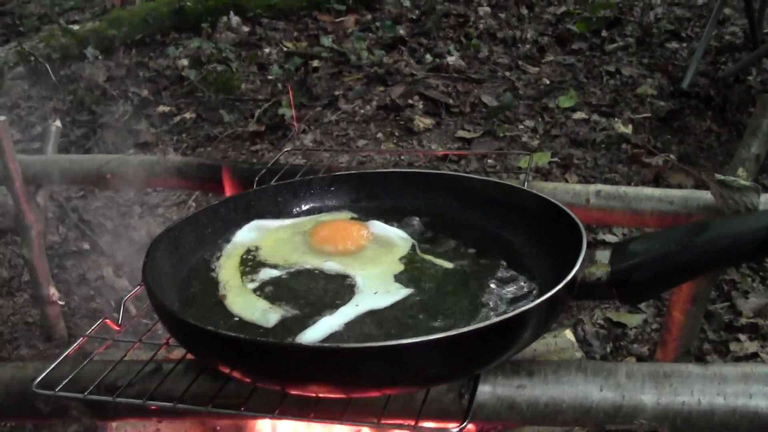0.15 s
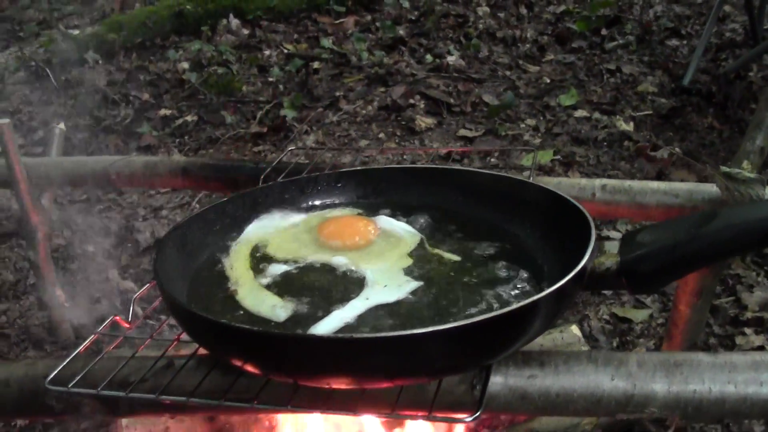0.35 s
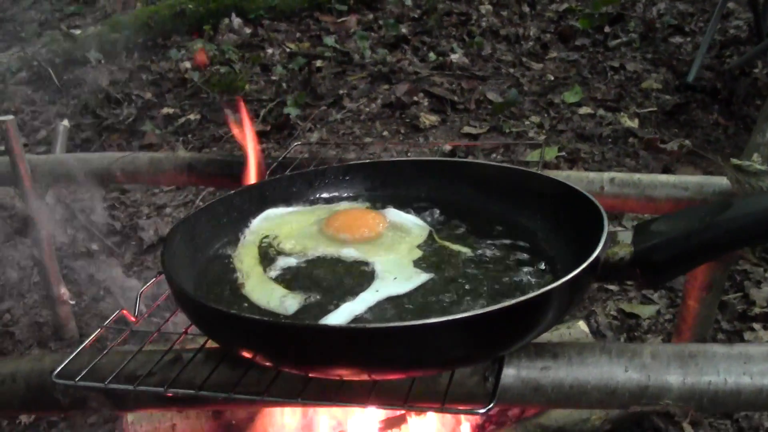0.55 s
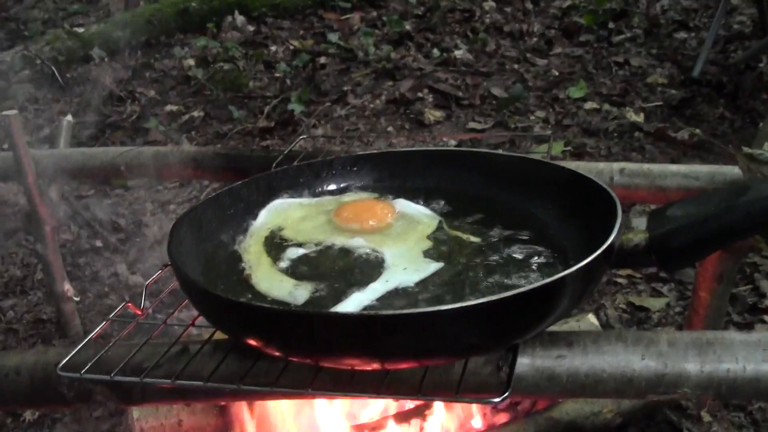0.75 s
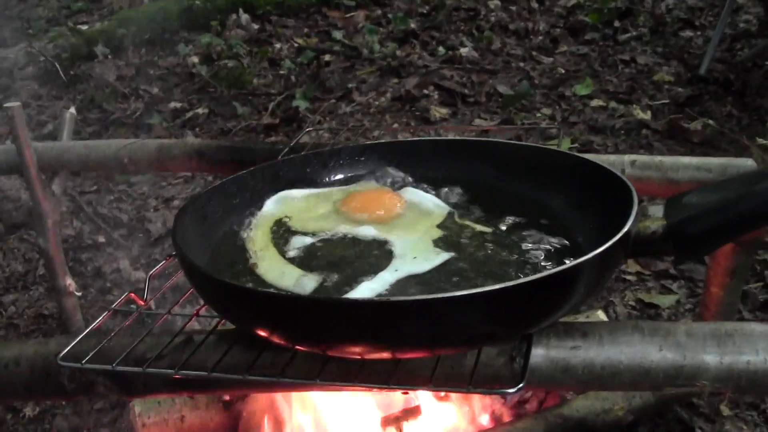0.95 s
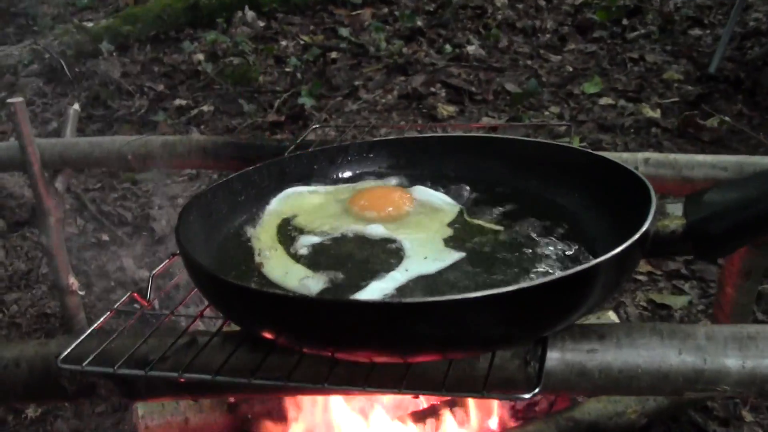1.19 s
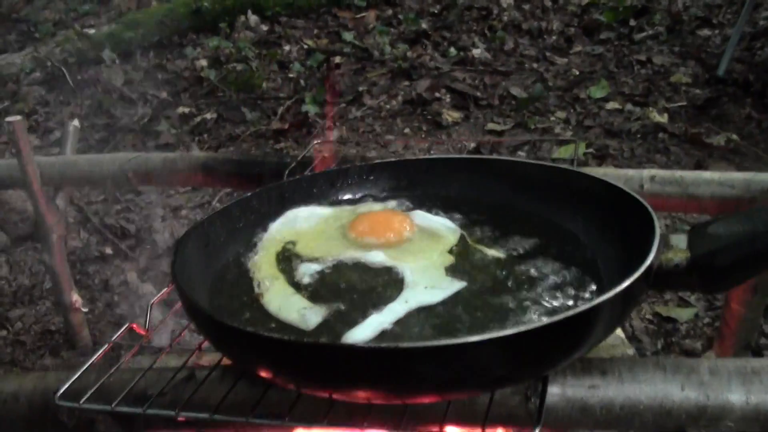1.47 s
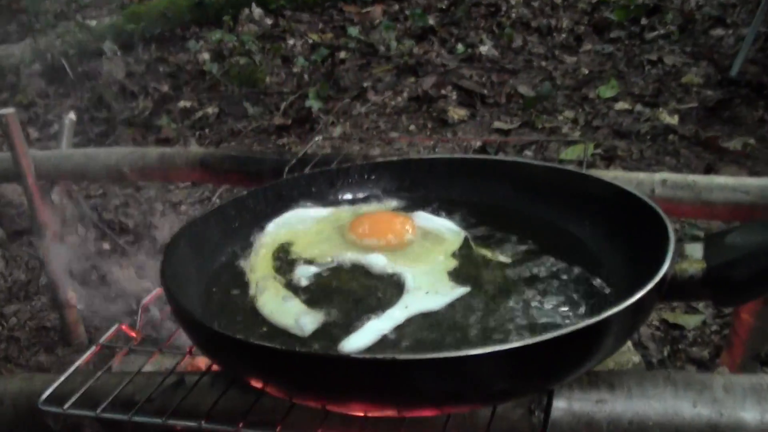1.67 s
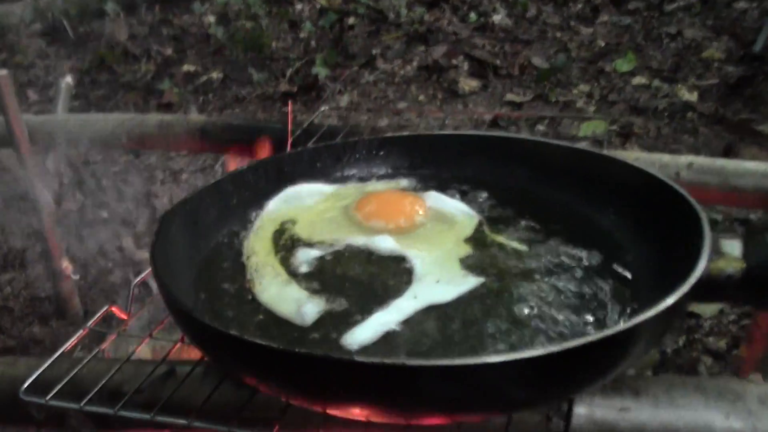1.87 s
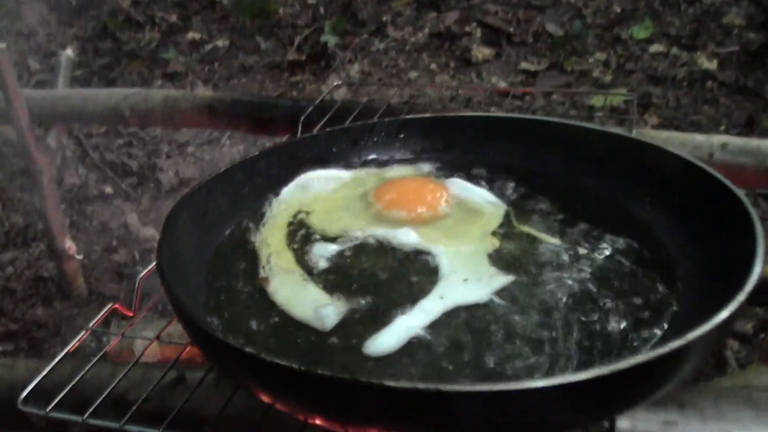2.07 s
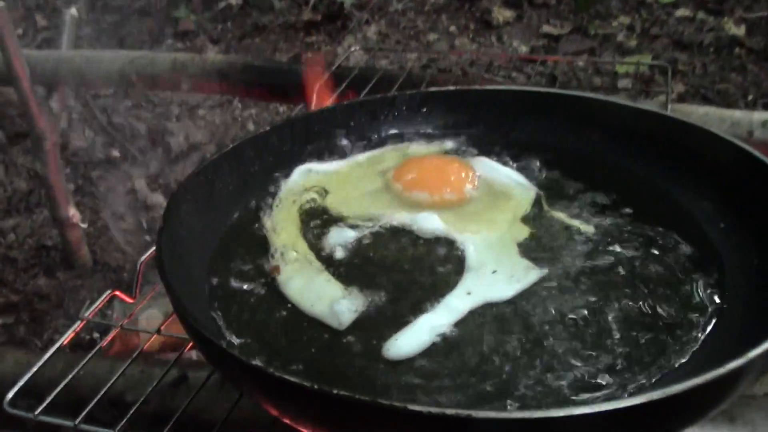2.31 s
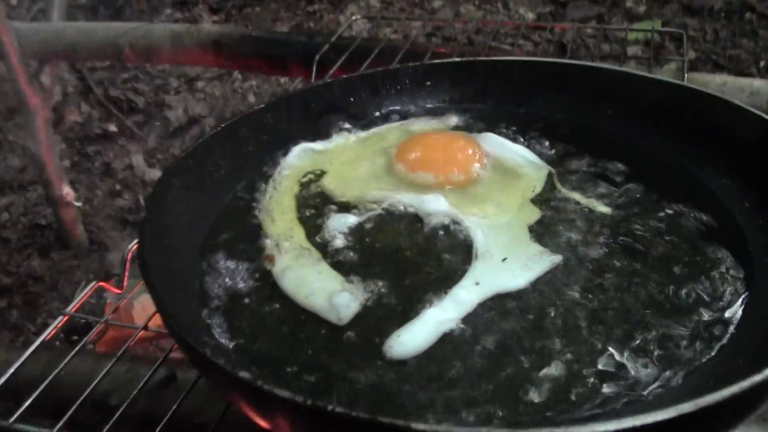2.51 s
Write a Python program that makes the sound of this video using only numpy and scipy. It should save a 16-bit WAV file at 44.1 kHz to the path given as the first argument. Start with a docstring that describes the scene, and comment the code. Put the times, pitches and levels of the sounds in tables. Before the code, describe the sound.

An egg sizzles in hot oil in a pan, with sharp irregular pops and spits

```python
"""An egg fries in oil over a campfire, heard from close by in the open air.
From the start steam bubbles sizzle as grains over hiss, water drops snap as damped resonances,
larger bubbles plop as rising sines, and the fire rumbles as low fluttering noise.
Near 1 s steam blurts from under the egg: gated flapping noise with gliding cavity tones.
Near 1.4 s the oil spits: noise jets through resonances; many of the later snaps are stronger."""
import sys
import numpy as np
from scipy import signal
from scipy.fft import rfft, irfft
from scipy.io import wavfile

SR = 44100
rng = np.random.default_rng(int(sys.argv[2]) if len(sys.argv) > 2 else 0)


def waveform_to_disk(signal):
    """Save audio, clipped to [-1, 1], as 16-bit WAV at the path in sys.argv[1]."""
    frames = np.transpose(np.atleast_2d(signal))
    scaled = np.clip(frames, -1, 1) * 32767
    samples = np.round(scaled).astype(np.int16)
    wavfile.write(sys.argv[1], SR, samples)


N = 116865

# vigour of the frying: t/s, treble level/dB before FIZZ_DB, middle level/dB before SIMMER_DB
VIGOUR = [(0.0, -40, -42.5), (0.32, -39.5, -41.5), (0.94, -40.5, -41), (1.3, -42, -41.5),
          (1.78, -39, -40.5), (2.35, -38, -37.5), (2.65, -39.5, -37.5)]
# spectra of the fine fizz and the coarser simmer: f/Hz, relative gain/dB
FIZZ_SPECTRUM = [(3500, -24), (5000, -8), (6500, -2), (8300, 1), (10000, -2.5), (12500, -8), (15500, -13)]
SIMMER_SPECTRUM = [(500, 0), (900, -10.5), (1400, -5.5), (2200, 0), (3200, 2.5), (4000, 0), (5000, -10),
                   (7000, -15)]
# spectra of the faint bubbling and of the tiny ringing bubbles: f/Hz, relative gain/dB
BLIP_SPECTRUM = [(500, 7), (1500, -4.0), (2500, 9.5)]
TINK_SPECTRUM = [(3000, 4.5), (5000, -7.5), (7000, 3.5), (11000, -10.5)]
# water drops bursting in the oil: t/s, level/dB before SNAP_DB, f/Hz, cycles to -60 dB
SNAPS = [(0.0557, -13, 8300, 11), (0.1009, -2.5, 7920, 4.3), (.115, -23.5, 2885, 7.3),
         (0.2063, -18.5, 4900, 5.5), (.226, -13, 4800, 1.3), (0.281, -21, 8200, 5.4),
         (0.3425, -10.5, 2610, 0.79), (0.3646, -16.5, 3930, 8.4), (0.456, -8, 5500, 1.3),
         (.554, -16, 8600, 7.7), (0.5687, -23.5, 3020, 8.6), (0.6145, -17.5, 7600, 6.5),
         (0.6144, -28.5, 3270, 9.4), (.632, -15, 8850, 8.7), (0.67, -21, 8900, 6), (0.6904, -29, 2630, 4.5),
         (.700, -16.5, 7950, 2.9), (0.727, -12.5, 8850, 4.5), (0.7693, -15.5, 3260, 7.3),
         (0.784, -18.5, 7100, 1.6), (0.8098, -25.5, 2440, 6.6), (0.869, -25.5, 3060, 8),
         (1.0632, -14, 6700, 6.8), (1.0715, -15.5, 2470, 13), (1.0956, -15, 3180, 7.4),
         (1.1543, -17, 3500, 8.1), (1.1548, -13, 11800, 6), (1.184, -18, 4860, 3.9),
         (1.2162, -19, 6500, 2.5), (1.265, -10, 4550, 1.9), (1.3025, -8, 9200, 4), (1.3499, -11, 8030, 9.5),
         (1.3731, -4, 7500, 2.2), (1.3905, -18, 4700, 1.8), (1.4683, -3, 6030, 1.1),
         (1.4852, -8.5, 10000, 18), (1.544, -16, 10500, 7), (1.6021, -8.5, 8280, 8),
         (1.6202, -10, 8100, 14), (1.6277, 2.5, 7800, 2.1), (1.6963, -7.5, 10900, 7.4),
         (1.7154, -11.5, 6540, 5.8), (1.7825, -1, 5030, 2.8), (1.7826, -7.5, 5800, 20),
         (1.893, -11.5, 2380, 0.72), (1.8933, 0.5, 7330, 11.4), (1.9221, -6.5, 5170, 1.1),
         (1.9392, -17, 3200, 2.9), (1.9933, -9, 5300, 3.7), (1.9944, -10.5, 6500, 28),
         (2.1318, -17.5, 3360, 10), (2.1357, -16.5, 2640, 7), (2.163, -13.5, 3170, 3.8),
         (2.1839, -2, 7440, 0.67), (2.2529, -3.5, 10900, 6.3), (2.2619, -13.5, 4600, 5.9),
         (2.3471, -13, 4030, 4.5), (2.3521, -15.5, 2690, 11), (2.4626, -2, 5760, 3.6),
         (2.5024, -12, 4800, 1.28), (2.5472, -17.5, 2620, 7)]
# larger bubbles opening at the surface: t/s, level/dB before PLOP_DB, starting f/Hz, cycles to -60 dB
PLOPS = [(.190, -18.5, 950, 3.8), (0.2528, -23.5, 980, 13), (0.2524, -20.5, 2100, 24),
         (0.2816, -16.5, 2240, 35), (0.3506, -13.5, 2320, 5.4), (0.3524, -21, 1600, 11),
         (.403, -24, 1420, 6.8), (0.4594, -11.5, 1490, 19), (0.4623, -8, 2900, 3.4), (.664, -28, 1450, 6),
         (0.699, -25.5, 1200, 5.1), (.758, -27.5, 1160, 7.1), (.834, -27, 1460, 8.9), (0.88, -16, 2870, 9),
         (.951, -23, 3720, 16), (1.339, -17.5, 2320, 7.7), (1.3607, -17.5, 2880, 13.4),
         (1.3691, -9.5, 4260, 30), (1.4707, -26, 3686, 280), (1.568, -20.5, 1440, 28),
         (1.6562, -24, 820, 7.2), (1.656, -21.5, 1991, 48), (1.765, -31, 564, 5.6),
         (1.9018, -10, 1510, 1.4), (1.921, -17.5, 1570, 7), (1.956, -22.5, 1490, 7.6),
         (2.058, -23.5, 1510, 8.3), (2.082, -32, 720, 14), (2.2681, -20, 1250, 8.2),
         (2.3057, -10.5, 4773, 31.5), (2.3789, -10.5, 1640, 4.4), (2.3853, -17, 1310, 9),
         (2.5626, -16.5, 1900, 16), (2.5635, -17, 1050, 7.8), (2.6123, -11, 1470, 3.1)]
# wet patches that sputter for a moment: t/s, length/s, level/dB before the swell, centre f/Hz
SPUTTERS = [(1.037, 0.16, -37, 2760), (1.451, 0.18, -37, 8060), (2.546, 0.055, -35, 3170)]
# steam cavities ringing under the egg: t/s, length/s, peak level/dB, first f/Hz, last f/Hz
CAVITIES = [(0.9915, 0.0044, -18, 1330, 1400), (.9945, 0.015, -10, 1505, 2517),
            (.9955, 0.0058, -10.5, 926, 775), (1.0003, 0.0089, -9, 915, 770),
            (1.0063, .006, -17, 2635, 2940), (1.0108, 0.011, -14.5, 790, 976),
            (1.013, 0.0071, -14.5, 2940, 3050)]
# spectrum of the flapping egg edge: f/Hz, relative gain/dB
BLURT_SPECTRUM = [(250, -21), (480, -5.5), (800, 1), (1400, 2), (2200, -5.5), (3100, -4.5), (4200, -17),
                  (5500, -31)]
# steam jets of the spit: t/s, length/s, mean level/dB before the final band-pass, centre f/Hz
JETS = [(1.3708, 0.0025, -18.5, 1350), (1.3699, 0.0045, -13.5, 3060), (1.3733, 0.0018, -13, 7600),
        (1.3756, 0.0014, -8, 6900), (1.381, .003, -14.5, 8500), (1.3817, 0.0045, -22.5, 3870),
        (1.3835, 0.00286, -23, 2260), (1.384, 0.0018, -15, 9500)]
# resonances of the crater that the jets blow through: f/Hz, width/Hz, relative level/dB
CRATER = [(1260, 280, 3), (2510, 310, 2), (3050, 240, -2.5), (4230, 540, 9), (6470, 550, 3),
          (8140, 450, 3.5), (9500, 340, -8), (11400, 1400, -14)]
# spectra of the fire, common part and left-right difference: f/Hz, relative gain/dB
FIRE_MID = [(20, -15), (45, -0.5), (140, -1.5), (350, -10.5), (1600, -16.5), (2200, -48)]
FIRE_SIDE = [(35, -2.5), (160, -1), (450, -8.5), (1400, -19.5)]
# spectrum of the microphone hiss: f/Hz, relative gain/dB
MIC_HISS = [(10500, -11), (12000, 0), (15500, -6)]

TIME = np.arange(N) / SR
SHORT = TIME[:SR // 16]  # time axis of one brief event, s
TOP_HZ = SR / 2.2  # highest usable filter edge
SIDES = np.array([[1], [-1]])  # sign of a difference signal: left, right

FIZZ_DB, FIZZ_PER_S, FIZZ_SPREAD_DB, FIZZ_HISS_DB = -1.26, 2600, 3.5, -3.5
SIMMER_DB, SIMMER_PER_S, SIMMER_SPREAD_DB, SIMMER_HISS_DB = -1.76, 2200, 3.0, -1.5
BLIPS_PER_S, BLIP_SPREAD_DB, BLIP_DB = 130, 3.5, -51
TINKS_PER_S, TINK_SPREAD_DB, TINK_DB = 170, 3.5, -46
SPUTTERS_PER_S = 4500  # grain rate
SNAP_DB, SNAP_CRACK_DB, SNAP_BODY_DB, SNAP_BODY_HZ, POP_TOP_HZ = 1.5, -27.5, -31, 1900, 11400
TEAR_S, TEAR_DB = 0.000638, -16  # typical lead of the film's tear; each draws its own
BUILD_UP_SHARE = 0.035  # build-up time as a share of the 60 dB ring time
WALL_DELAY_S, WALL_SHARE = 0.00044, 0.29  # typical first reflection off the pan wall
PLOP_DB, PLOP_FILM_DB = -0.5, -18
PLOP_RISE, PLOP_ATTACK_CYCLES = 0.11, 0.23  # share of pitch gained over the 60 dB ring time
PLOP_WOBBLE, PLOP_WOBBLE_HZ = 0.3, 257  # depth and upper rate of the roughness
BLURT_S, BLURT_LENGTH_S, BLURT_EDGE_S, FLAPS_PER_S = 0.9915, 0.0305, 0.00086, 1200
BLURT_DB, BLURT_LEFT_DB = -19.5, 0.37  # the egg lies a little to the left
AFTER_RING_HZ, AFTER_RING_CYCLES, AFTER_RING_DB = 915, 22, -16
BLURT_LOW_HZ, SPIT_LOW_HZ = 470, 1100  # the blurt and the spit carry little below these
JET_EDGE_S, JET_OCTAVES, JET_DROPS_PER_S = 0.00027, 0.38, 5900
DIP_HZ, DIP_Q, DIP_DEPTH = 5125, 4.7, 0.53  # depth is the share of amplitude removed
# scattered tail of the pops, and the level of its left-right difference
SCATTER_DB, SCATTER_T60_S, POP_WIDTH_DB = -15.5, 0.025, -27.5
GROUND_DB, GROUND_T60_S = -19, 0.076  # off the ground and trees
FIRE_DB, FIRE_WIDTH_DB, FIRE_FLUTTER_DB, FIRE_LEFT_DB = -47.5, -5, 1.5, 0.54
MIC_HISS_DB, CUTOFF_HZ = -61, 16700


def from_db(db):
    """Amplitude ratio: twenty decibels are a factor of ten."""
    return 10 ** (np.asarray(db) / 20)


def rms_one(x):
    """Normalisation: scale to a root mean square of one."""
    return x / np.sqrt(np.mean(x ** 2) + 1e-20)


def peak_one(x):
    """Normalisation: scale to a peak of one."""
    return x / abs(x).max()


def add(out, s, sound):
    """Superposition: mix a sound in at a time in seconds."""
    i = int(s * SR)
    out[i:i + len(sound)] += sound[:N - i]


def butter(x, order, edges, kind):
    """Linear filtering: a Butterworth low, high or band pass."""
    return signal.sosfilt(signal.butter(order, edges, kind, fs=SR, output="sos"), x)


def colour(x, spectrum):
    """Spectral shaping: gains interpolated over log frequency, falling 18 dB an octave beyond the ends."""
    hz, db = np.transpose(spectrum)
    octave = np.log2(np.fft.rfftfreq(len(x), 1 / SR) + 1)
    known = np.log2(hz)
    skirt = 18 * abs(octave - np.clip(octave, known[0], known[-1]))
    gain = from_db(np.interp(octave, known, db) - skirt)
    return rms_one(irfft(rfft(x) * gain, len(x)))


def drift(rate_hz):
    """Low-passed noise: a slow random wander of spread about one."""
    step = 40  # samples between computed points
    r = np.exp(-2 * np.pi * rate_hz * step / SR)
    noise = rng.standard_normal(N // step + 2002)
    slow = signal.lfilter([1], [1, -2 * r, r * r], noise)[2000:]  # drop the filter's start
    return np.interp(np.arange(N) / step, np.arange(len(slow)), rms_one(slow))


def ping(hz, cycles, rise=0, attack_s=0):
    """Damped oscillation: a sine falling 60 dB in the given cycles, its pitch gaining the share rise a second."""
    tone = np.sin(2 * np.pi * hz * SHORT * (1 + rise * SHORT / 2))
    decay = np.exp(-np.log(1000) * SHORT * hz / cycles)
    attack = 1 - np.exp(-SHORT / (attack_s + 1e-9))
    return peak_one(tone * decay * attack)


def burst(hz, cycles):
    """Damped resonance in a limited band: the longer the ring, the lower the upper edge."""
    edges = [hz / 2.21, min((1 + 4 / cycles) * hz, TOP_HZ)]
    ring = ping(hz, cycles, attack_s=BUILD_UP_SHARE * cycles / hz)
    return peak_one(butter(ring, 2, edges, "band"))


def grains(per_s, spread_db, low_hz, high_hz, cycles):
    """Shot noise: random clicks of many sizes, dealt among 20 damped resonators."""
    excess = np.minimum(rng.exponential(1, N), 5.5)
    sizes = from_db(spread_db * excess) * rng.choice([-1, 1], N)
    clicks = sizes * (rng.random(N) < per_s / SR)
    dealt = rng.integers(0, 20, N)
    out = np.zeros(N)
    for k, hz in enumerate(np.geomspace(low_hz, high_hz, 20)):
        r = np.exp(-np.log(1000) * hz / cycles / SR)
        poles = [1, -2 * r * np.cos(2 * np.pi * hz / SR), r * r]
        ringing = signal.lfilter([1, 0, -1], poles, clicks * (dealt == k) + 1e-18)
        out += np.sqrt(hz * (1 - r)) * ringing
    return rms_one(out)


def sizzle():
    """Random superposition: fine fizz and coarser simmer, each grains over hiss, with faint bubbling."""
    s, treble_db, middle_db = np.transpose(VIGOUR)
    fizz = grains(FIZZ_PER_S, FIZZ_SPREAD_DB, 3400, TOP_HZ, cycles=3.77)
    fizz = fizz + from_db(FIZZ_HISS_DB) * rng.standard_normal(N)
    simmer = grains(SIMMER_PER_S, SIMMER_SPREAD_DB, 916, 5740, cycles=14.3)
    simmer = simmer + from_db(SIMMER_HISS_DB) * rng.standard_normal(N)
    blips = colour(grains(BLIPS_PER_S, BLIP_SPREAD_DB, 710, 2690, cycles=9.9), BLIP_SPECTRUM)
    fizz_db = np.interp(TIME, s, treble_db) + FIZZ_DB + 0.5 * drift(13.0)
    simmer_db = np.interp(TIME, s, middle_db) + SIMMER_DB + 0.47 * drift(21)
    frying = from_db(fizz_db) * colour(fizz, FIZZ_SPECTRUM)
    frying += from_db(simmer_db) * colour(simmer, SIMMER_SPECTRUM)
    return frying + from_db(BLIP_DB) * blips


def snaps():
    """Flash boiling: each drop gives a faint tear, then a short ring with a sharp crack and a low knock."""
    out = np.zeros(N)
    crack = from_db(SNAP_CRACK_DB) * burst(5300, 0.56)
    variations = rng.uniform(0.56, 1.7, (len(SNAPS), 4))
    for (s, db, hz, cycles), (lead, detune, size, path) in zip(SNAPS, variations):
        tear = burst(hz * np.sqrt(detune) * 0.82, cycles)
        add(out, s - lead * TEAR_S, from_db(db + TEAR_DB) * tear)
        knock = from_db(SNAP_BODY_DB) * burst(SNAP_BODY_HZ * size, 17.0)
        snap = from_db(db + SNAP_DB) * (burst(hz, cycles) + crack + knock)
        add(out, s, snap)
        add(out, s + path * WALL_DELAY_S, WALL_SHARE * snap)
    return butter(out, 1, POP_TOP_HZ, "low")


def plops():
    """Cavity resonance: the film breaks with a tick and the cavity rings, rising and wobbling."""
    out = np.zeros(N)
    shake = colour(rng.standard_normal(N), [(40, 0), (PLOP_WOBBLE_HZ, 0)])
    tick = from_db(PLOP_FILM_DB) * burst(2900, 1.1)
    for s, db, hz, cycles in PLOPS:
        wobble = np.roll(shake, -int(s * SR))[:len(SHORT)]
        wobble = wobble * np.minimum(SHORT * PLOP_WOBBLE_HZ, 1)  # the roughness sets in gradually
        ring = ping(hz, cycles, PLOP_RISE * hz / cycles, PLOP_ATTACK_CYCLES / hz)
        tone = butter(ring * (1 + PLOP_WOBBLE * wobble), 2, hz / 2, "high")
        add(out, s, from_db(db + PLOP_DB) * (tone + tick))
    return out


def blurt():
    """Interrupted flow: escaping steam flaps the egg's edge and blows gliding tones in cavities below it."""
    flaps = rng.choice([-1, 1], N) * (rng.random(N) < FLAPS_PER_S / SR)
    flaps = flaps + 0.079 * rng.standard_normal(N)
    end_s = BLURT_S + BLURT_LENGTH_S
    gate = np.clip(np.minimum(TIME - BLURT_S, end_s - TIME) / BLURT_EDGE_S, 0, 1)
    flapping = colour(flaps, BLURT_SPECTRUM) * gate
    out = from_db(BLURT_DB) * butter(flapping, 2, BLURT_LOW_HZ, "high")
    # the emptied pocket rings on
    after_ring = ping(AFTER_RING_HZ, AFTER_RING_CYCLES, attack_s=1 / AFTER_RING_HZ)
    add(out, end_s, from_db(AFTER_RING_DB) * after_ring)
    for s, length, db, first_hz, last_hz in CAVITIES:
        u = np.linspace(0, 1, int(length * SR))
        phase = 2 * np.pi * np.cumsum(first_hz + (last_hz - first_hz) * u) / SR
        add(out, s, from_db(db) * np.sin(np.pi * u) * np.sin(phase))
    return out


def spit():
    """Forced resonance: ragged steam jets each excite their own part of the crater's resonances."""
    out = np.zeros(N)
    for s, length, db, centre_hz in JETS:
        t = SHORT[:int(length * SR)]
        noise = rng.standard_normal(len(t))
        droplets = rng.random(len(t)) < JET_DROPS_PER_S / SR
        edges = np.minimum(np.minimum(t, length - t) / JET_EDGE_S, 1)
        push = np.pad(noise * (0.08 + droplets) * edges, (0, len(SHORT) - len(t)))
        jet = np.zeros(len(SHORT))
        for hz, width_hz, level_db in CRATER:
            ring = signal.lfilter(*signal.iirpeak(hz, hz / width_hz, fs=SR), push)
            nearness = np.exp(-(np.log2(hz / centre_hz) / JET_OCTAVES) ** 2)
            jet += rms_one(ring) * from_db(level_db) * nearness
        # energy in proportion to the jet's length
        add(out, s, from_db(db) * rms_one(jet) * np.sqrt(len(t) / len(SHORT)))
    return butter(out, 2, [SPIT_LOW_HZ, POP_TOP_HZ], "band")


def sputters():
    """Transient boiling: water reaches the hot oil and boils off in a brief swell of grains."""
    out = np.zeros(N)
    for s, length, db, hz in SPUTTERS:
        spray = grains(SPUTTERS_PER_S, 4.0, hz / 2.04, hz * 2.0, cycles=3.33)
        spray = colour(spray, [(hz / 1.26, 0), (hz * 1.03, 0)])
        swell = np.sin(np.pi * np.clip((TIME - s) / length, 0, 1) ** 0.62)
        out += from_db(db) * spray * swell
    return out


def tinks():
    """Lightly damped resonance: a thin spray of tiny, clearly pitched bubbles that ring on in the fizz."""
    bubbles = grains(TINKS_PER_S, TINK_SPREAD_DB, 3450, 11360, cycles=23)
    return from_db(TINK_DB) * colour(bubbles, TINK_SPECTRUM)


def hollow(x):
    """Band rejection: a partial notch dips the pops around one pitch."""
    notched = signal.lfilter(*signal.iirnotch(DIP_HZ, DIP_Q, fs=SR), x)
    return x + DIP_DEPTH * (notched - x)


def echoes(x, t60, low_hz, high_hz):
    """Diffuse reflection: convolution with band-limited noise that falls 60 dB in t60 seconds."""
    t = TIME[:SR // 4]
    spray = butter(rng.standard_normal(len(t)), 1, [low_hz, high_hz], "band")
    spray = spray * from_db(-60 * t / t60) * (t > 0.0004)  # silent before the first reflection
    return signal.fftconvolve(x, spray / np.linalg.norm(spray))[:N]


def fire():
    """Turbulent combustion: a low fluttering rumble, wide in the air and a little to the left."""
    mid = colour(rng.standard_normal(N), FIRE_MID)
    side = colour(rng.standard_normal(N), FIRE_SIDE)
    level_db = FIRE_DB + FIRE_FLUTTER_DB * drift(5.0) + FIRE_LEFT_DB * SIDES
    return from_db(level_db) * (mid + from_db(FIRE_WIDTH_DB) * side * SIDES)


def scene():
    """Superposition of direct and reflected sound: the pan ahead, faint outdoor echoes, the fire beneath."""
    steam = blurt()
    pops = hollow(snaps() + plops() + spit()) + steam
    width = from_db(POP_WIDTH_DB) * echoes(pops, SCATTER_T60_S, 270, TOP_HZ)
    side = SIDES * (width + (from_db(BLURT_LEFT_DB) - 1) * steam)
    pops = pops + from_db(SCATTER_DB) * echoes(pops, SCATTER_T60_S, 1500, 16000)
    frying = sizzle() + tinks() + sputters()
    ground = from_db(GROUND_DB) * echoes(pops, GROUND_T60_S, 467, 3900)
    return pops + side + ground + frying + fire()


def record(dry):
    """Transduction limits: microphone hiss is added, the highest peaks are clipped and the top is cut."""
    hiss = np.array([colour(rng.standard_normal(N), MIC_HISS) for _ in range(2)])
    clipped = np.clip(dry + from_db(MIC_HISS_DB) * hiss, -0.95, 0.95)
    top_cut = signal.cheby2(16, 60, CUTOFF_HZ, fs=SR, output="sos")  # 60 dB down from the cutoff on
    return signal.sosfilt(top_cut, clipped)


dry = scene()
out = record(dry)
waveform_to_disk(out)
```